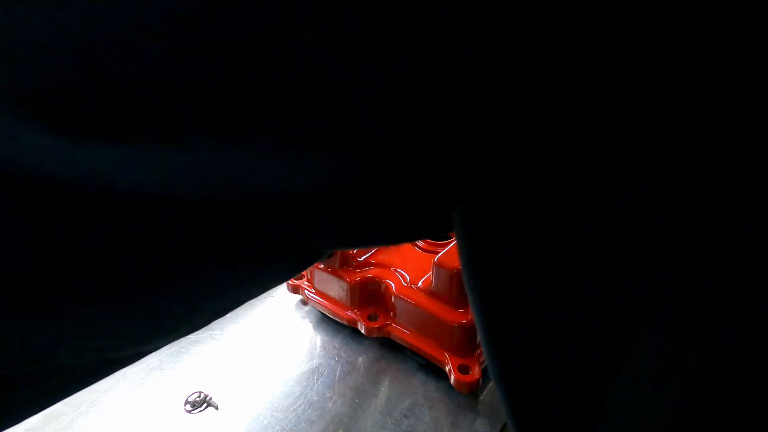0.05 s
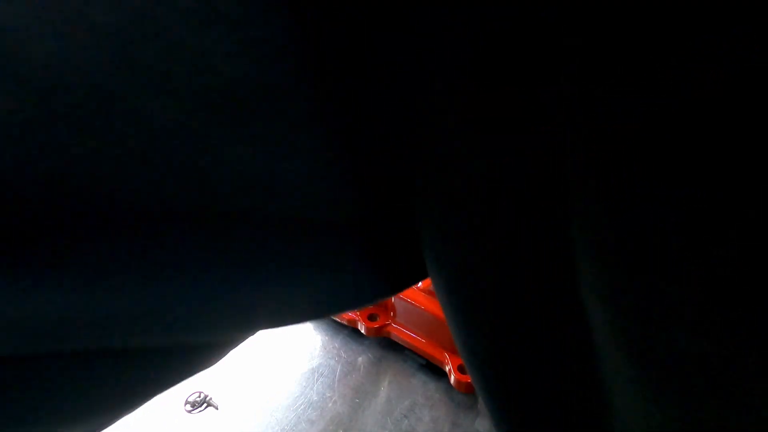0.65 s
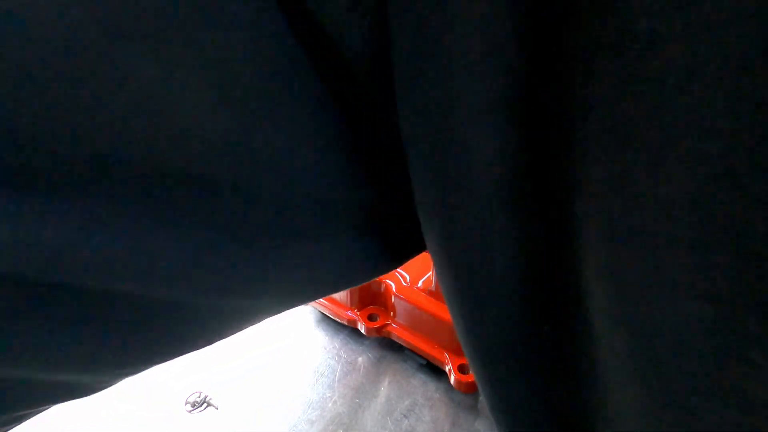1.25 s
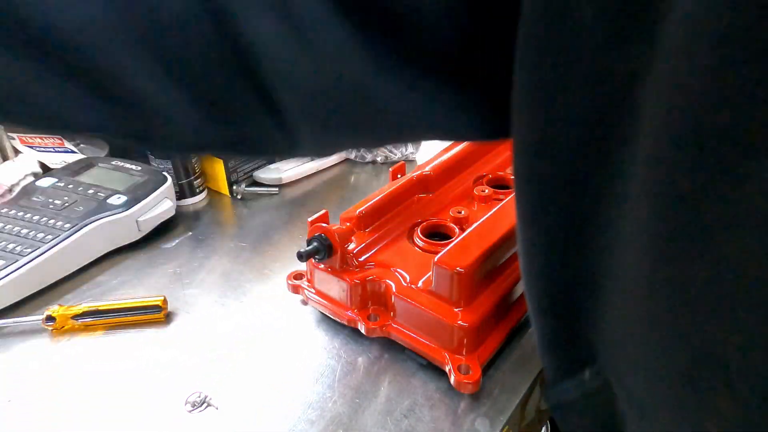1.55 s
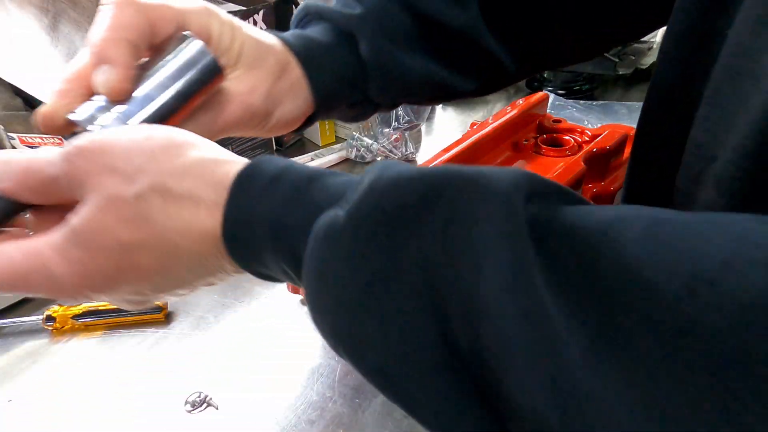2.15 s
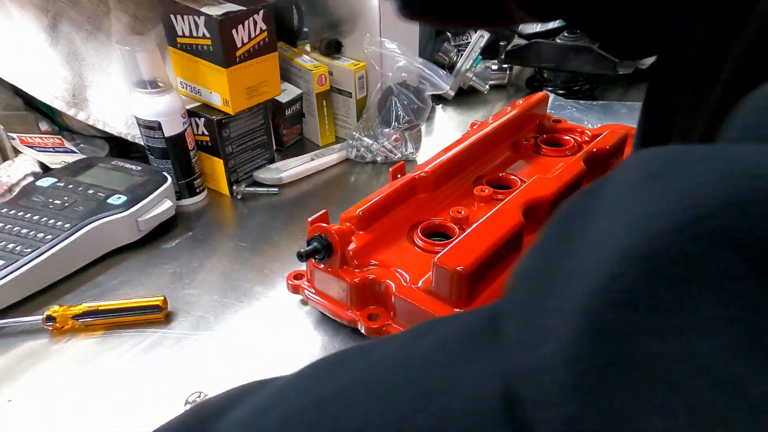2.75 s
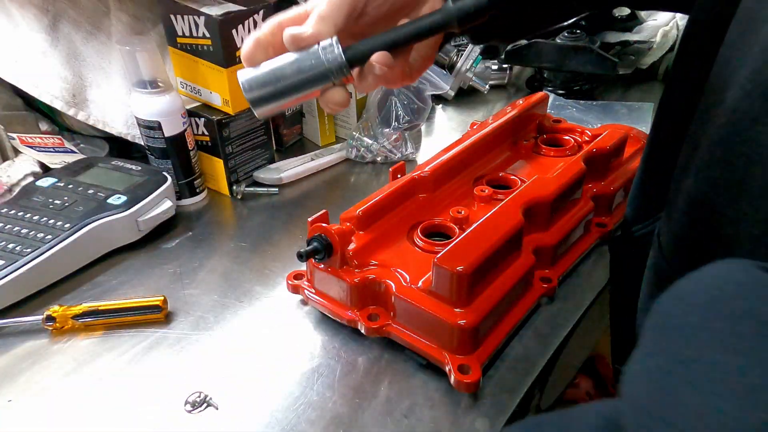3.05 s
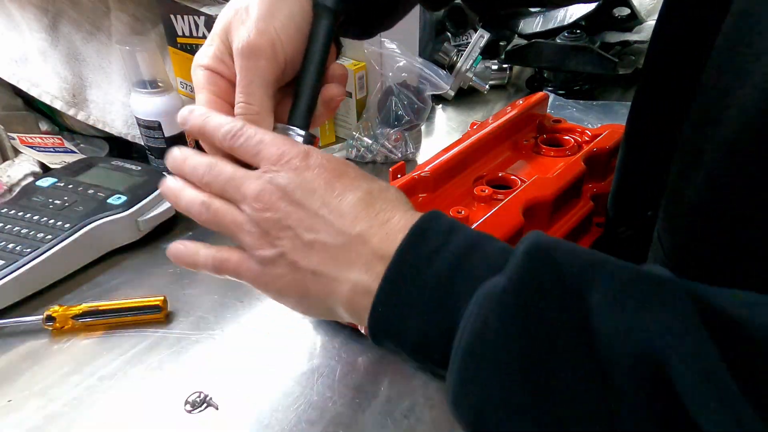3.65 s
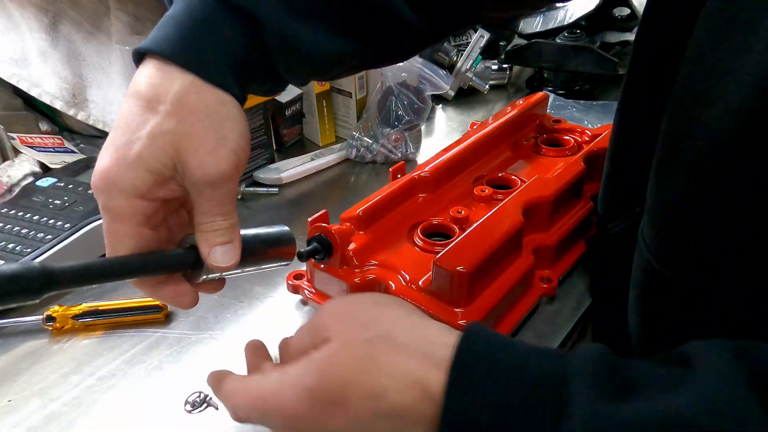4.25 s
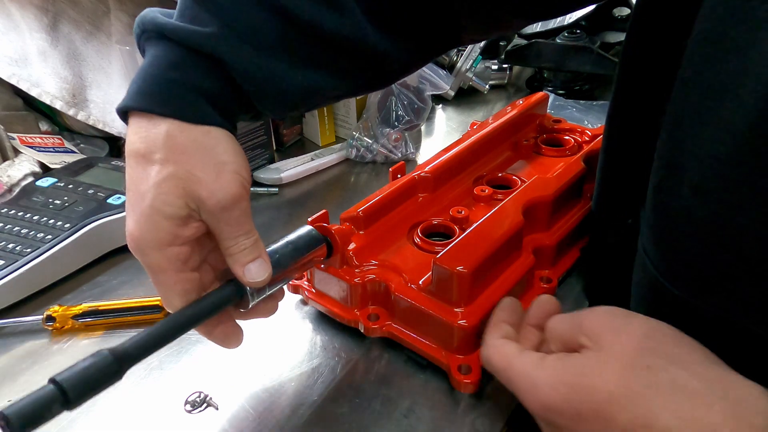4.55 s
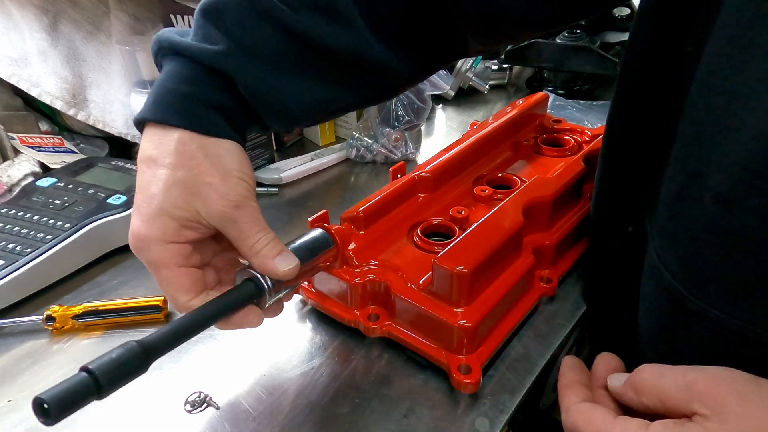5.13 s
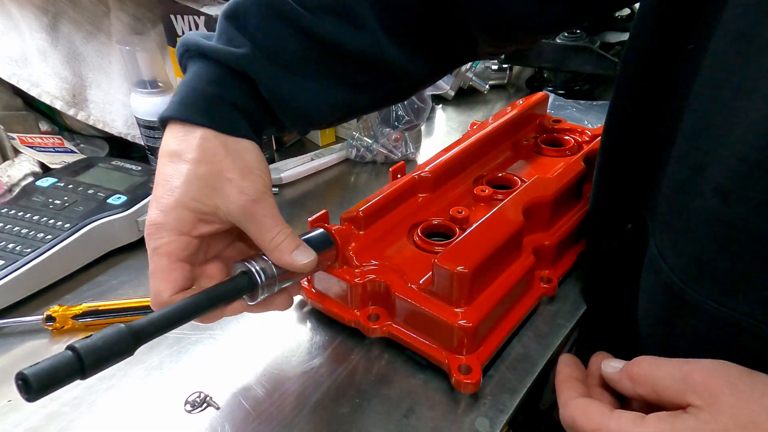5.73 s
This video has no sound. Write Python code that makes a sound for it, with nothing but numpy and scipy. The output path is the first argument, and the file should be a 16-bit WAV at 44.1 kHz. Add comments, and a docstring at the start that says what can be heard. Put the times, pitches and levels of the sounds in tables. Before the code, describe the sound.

In a small garage, steel tools clang and clink as a socket extension is drawn out from among them with a ringing scrape. A loose socket ticks, a spare tool clunks onto the workbench, and the socket rattles against the extension. It then knocks and thumps on a valve cover fitting, with faint, thin squeaks. Sleeves rustle over a low hum, heard in stereo at arm's length.

```python
"""Steel tools thump, clink and sing as a mechanic draws a socket extension out from among them.
A deep socket rattles and knocks on the extension in his hands, and a spare tool goes down on the bench.
The socket is then tried on a fitting of a valve cover, which thumps when pushed; the twists chirp.
Sleeves rustle over the faint hum of a small, cluttered garage. Stereo microphone at arm's length."""
import sys
import numpy as np
from scipy import signal
from scipy.fft import rfft, irfft, next_fast_len
from scipy.io import wavfile
from scipy.ndimage import uniform_filter1d

SR = 44100
rng = np.random.default_rng(int(sys.argv[2]) if len(sys.argv) > 2 else 0)


def transcribe(u):
    """Save the signal u as a 16-bit wav file named by the first command-line argument.

    u: samples, shape (n,) or (channels, n), limited to [-1, 1]; the rate is SR.
    q: integer samples, one column per channel.
    """
    v = np.clip(np.atleast_2d(u).T, -1, 1)
    q = np.round(v * 32767).astype(np.int16)
    wavfile.write(sys.argv[1], SR, q)


N = 259749
T = np.arange(N) / SR

# Modes of the steel tools, struck or rubbed: (frequency [Hz], level [dB], t60 [s])
STEEL_MODES = [(1725, -13, .1), (2053, -10, .2), (2498, -14, .25), (3044, -14, .25), (3836, -7, .2),
               (4328, -3, .3), (4694, -4, .16), (5125, -1, .3), (5321, 0, .3), (5650, -2, .06),
               (6280, -2, .2), (7224, -6, .1), (8037, -2, .35), (8474, -6, .3), (8690, -14, .2),
               (8905, -2, .3), (10840, -9, .25), (11240, -7, .2), (11510, -10, .3), (11940, -8, .35),
               (12060, -6, .45), (12250, -9, .3), (12720, -10, .3), (13120, -12, .25)]


def undb(db):
    """Decibels to gain."""
    return 10 ** (np.asarray(db) / 20)


def unit(x):
    """Scale to rms 1."""
    return x / np.sqrt(np.mean(x ** 2))


def fade(t, t60):
    """Exponential decay, 60 dB down after t60 seconds."""
    return np.exp(-np.log(1000) * t / t60)


def gesture(t, length_s, attack_s, release_s):
    """Envelope of a movement: it rises, holds until length_s and dies away."""
    return np.clip(t / attack_s, 0, 1) * np.exp(-np.maximum(t - length_s, 0) / release_s)


def add(out, start_s, sound):
    """Mix a sound in at its time."""
    i = int(start_s * SR)
    out[:, i:i + sound.shape[1]] += sound[:, :N - i]


def band(x, low_hz, high_hz):
    """Causal band-pass."""
    return signal.sosfilt(signal.butter(4, [low_hz, high_hz], "band", fs=SR, output="sos"), x)


def colour(x, hz, db):
    """Causal filter through (Hz, dB) points, built from the cepstrum."""
    n = 2 * next_fast_len(x.shape[-1] // 2 + 2048, True)
    gain_db = np.interp(np.log(np.arange(n // 2 + 1) * SR / n + 1), np.log(hz), db)
    cepstrum = irfft(np.log(undb(gain_db)))
    cepstrum[1:n // 2] *= 2
    cepstrum[n // 2 + 1:] = 0
    return irfft(rfft(x, n) * np.exp(rfft(cepstrum)))[..., :x.shape[-1]]


def drift(rate_hz, size=N):
    """Smooth random drift of rms 1."""
    hold = max(int(SR / rate_hz), 1)
    steps = np.repeat(rng.standard_normal(size // hold + 1), hold)
    return unit(uniform_filter1d(uniform_filter1d(steps, hold), hold)[:size])


def stereo_noise(size, side):
    """White noise whose stereo width grows with side."""
    mid, diff = rng.standard_normal((2, size))
    return mid + side * np.array([diff, -diff])


def panned(x, pan_db):
    """Place a sound by its left minus right level."""
    return x * undb(np.array([[pan_db], [-pan_db]]) / 2)


def placed(x, pan_db):
    """Pan the treble by pan_db; the bass reaches both channels nearly alike."""
    return np.array([colour(channel, [200, 1500], [db / 8, db / 2])
                     for channel, db in zip(x, (pan_db, -pan_db))])


def contact(strike, slide_s, band_db):
    """One contact: a slide repeats the strike as chatter, and the attack is brought toward band_db."""
    # Thump, body, edge and top: (low edge [Hz], high edge [Hz]), then (centre [Hz]) of each
    bands = [(80, 600), (600, 2500), (2500, 7000), (7000, 16000)]
    centres = [250, 1300, 4300, 10000]
    count = int(slide_s * SR)
    if count > 1:
        slipping = rng.random(count) < 1100 / SR  # about 1100 slips a second
        slips = slipping * rng.standard_normal(count) * np.linspace(1, .6, count)
        slips[0] = 1
        strike = signal.fftconvolve(strike, slips[None], axes=1)[:, :strike.shape[1]]
    attack = strike[:, :int((.012 + slide_s) * SR)]
    tint_db = np.zeros(len(bands))
    for _ in range(2):  # two passes, as the bands overlap
        tinted = colour(attack, centres, tint_db)
        power = [np.mean(band(tinted, *edges) ** 2) for edges in bands]
        tint_db += band_db - 10 * np.log10(power)
    curve_db = np.r_[tint_db[0] - 16, tint_db[0] - 1, tint_db, tint_db[-1] - 4]
    return colour(strike, [25, 90, *centres, 13000], curve_db)


def struck(hits, modes, balance_db, ring_s, pan_db, crack_db, crack_s, scatter_db, scatter_s):
    """An object's contacts: modes, a dense crack and scatter from things nearby; the times are t60s."""
    # Hardness moves energy upward: (thump, body, edge, top) [dB per dB of hardness]
    hardness_tilt = [-1.55, -0.29, 0.66, 0.79]
    usual_db, doubling_db = -31, 7  # every 7 dB over an ordinary contact doubles ring_s
    out = np.zeros((2, N))
    t = np.arange(int(.35 * SR)) / SR
    hz, db, t60 = np.transpose(modes)
    partials = fade(t, t60[:, None]) * np.exp(2j * np.pi * hz[:, None] * t)
    for start, slide_s, strength_db, hardness_db, *thump_db in hits:
        # each contact point favours other modes; high ones reach the two channels out of step
        size, sign, skew = rng.standard_normal((len(modes), 3)).T
        phase = np.array([[1], [-1]]) * skew * hz / 16000
        weights = np.sign(sign) * undb(db + 2 * size) * np.exp(1j * phase)
        free_s = ring_s * 2 ** ((strength_db - usual_db) / doubling_db)
        ring = (weights @ partials).imag * fade(t, max(free_s, .02))  # the fingers damp the steel
        burst = stereo_noise(len(t), .31) * fade(t, crack_s)
        scatter = stereo_noise(len(t), .97) * fade(t, scatter_s) * undb(scatter_db)
        crack = undb(crack_db) * signal.lfilter([1, -1], [1, -.93], burst + scatter)  # bass cut
        band_db = strength_db + np.array(balance_db) + hardness_db * np.array(hardness_tilt)
        if thump_db:  # a push that rocks the whole object sets its own thump
            band_db[0] = thump_db[0]
        add(out, start, contact(ring + crack, slide_s, band_db))
    return placed(out, pan_db)


def garage_air():
    """Room tone: gently wavering air noise and narrow bands of machine hum."""
    # Still air: (frequency [Hz], relative level [dB])
    air_spectrum = [(15, -38), (25, 7.5), (76, -11), (127, 2.5), (344, -11.5), (863, -30), (1100, -32),
                    (1440, -18.5), (1650, -16.5), (1890, -10.5), (2610, -15), (7510, -33.5), (12200, -40.5),
                    (14400, -65), (16000, -36.5)]
    # Machine hum: (centre [Hz], width [Hz], level [dB])
    hum_bands = [(119.24, 7.6, -58), (1644, 92, -66.5), (1107, 180, -73.5)]
    air = unit(colour(stereo_noise(N, .4), *np.transpose(air_spectrum))) * undb(-61 + drift(5.5))
    hum = sum(undb(db) * unit(band(stereo_noise(N, .34), hz - width / 2, hz + width / 2))
              for hz, width, db in hum_bands)
    return air + hum


def rustling_sleeves():
    """Cloth, skin and steel rub in grainy strokes; a bright stroke trades bass for hiss."""
    # Strokes of sleeves and hands: (time [s], length [s], level [dB], brightness [dB])
    strokes = [(0, 0.33, -58, -5), (0.317, 0.1, -39.5, -6), (0.724, 0.37, -44.5, 6),
               (1.104, 0.38, -44, 5.5), (1.807, 0.3, -60, 12.5), (2.291, 0.17, -64.5, 13),
               (2.955, .12, -47, -4.5), (3.145, 0.052, -41, 7), (3.26, 0.25, -57.5, 1),
               (3.48, 0.39, -52, -3.5), (4.018, 0.12, -64, 17), (4.634, 0.44, -55.5, -4),
               (5.098, 0.15, -44.5, -5), (5.22, .3, -44, 3), (5.576, 0.41, -48, -1.5)]
    # Register balance of a stroke, then the floor of arms that never quite rest: (low, mid, high) [dB]
    balance_db = [-2.5, -5.5, -18]
    fidget_db = [-58.5, -64.5, -71]
    # Colour of the rubbing: (frequency [Hz], relative level [dB])
    rub_spectrum = [(40, 3.5), (130, 3.5), (260, 1.5), (450, -10), (750, -18.5), (1080, -8.5), (1600, -16),
                    (2400, -12.5), (4000, -15), (7000, -15), (10000, -29.5), (12500, -32), (14000, -45.5)]
    gains = undb(fidget_db)[:, None] * np.ones(N)
    for start, length_s, db, bright_db in strokes:
        envelope = gesture(T - start, length_s, attack_s=.03, release_s=.064)
        stroke = undb(db + np.array(balance_db) + bright_db * np.array([-1, 0, 1]))
        gains = np.hypot(gains, stroke[:, None] * envelope)
    grain = stereo_noise(N, .36) * undb(1.97 * drift(500))
    rub = colour(grain, *np.transpose(rub_spectrum))
    registers = band(rub, 38, 550), band(rub, 590, 2640), band(rub, 3300, 14000)
    rustle = sum(gain * undb(2 * drift(25)) * unit(noise) for gain, noise in zip(gains, registers))
    return panned(rustle, 1.4)


def rummaged_tools():
    """Left of centre, tools knock and slide on each other and thump the surface under them."""
    # Tool on tool: (time [s], slide [s], strength [dB], hardness [dB])
    hits = [(.2925, 0.0015, -26.5, 3.5), (.3005, 0.015, -36, -13.5), (.3255, .006, -24.5, 3.5),
            (.3335, 0.0074, -23, -1), (.35, 0.0061, -40.5, -4), (.385, 0.098, -42, 7.5),
            (.5858, 0.019, -45, 5), (.6114, 0.003, -39, -1), (.7086, 0.012, -43.5, 3.5),
            (.768, 0.0038, -41, 1.5), (.7819, 0.0056, -39.5, -2), (.7937, 0.013, -43, 18.5),
            (.82, 0.021, -33, 2), (.878, 0, -52.5, 17), (.9314, 0.02, -45.5, 2), (.979, 0.0051, -43, -1.5),
            (1.0205, 0.016, -49.5, 5.5), (1.0672, 0.0089, -43, 1.5), (1.0953, 0.015, -47, 2.5),
            (1.1196, 0, -38.5, 3), (1.1791, 0.022, -37.5, -1.5), (1.186, 0.028, -35.5, 4.5),
            (1.212, 0.031, -33, 5), (1.25, 0.04, -45, -1), (1.402, 0.011, -33, 8),
            (1.428, 0.013, -34.5, 8.5), (1.4581, 0.002, -35.5, 8.5), (1.4751, 0.0046, -37.5, 7),
            (1.5416, 0.0061, -42.5, 3.5), (1.5914, 0.023, -46.5, 5)]
    # Surface under the tools: (frequency [Hz], level [dB], t60 [s])
    tray_modes = [(87, -2, 0.094), (124.3, 6, 0.63), (157, -2.5, .08), (238, -2.5, 0.17),
                  (265.5, 10.5, 0.12), (317, 4, 0.17), (416, 6.5, 0.078), (418, 10.5, 0.072),
                  (549, -3, 0.12), (643, -10, .05), (828, -5.5, 0.065), (966, 3, 0.13), (1026, 6, 0.15),
                  (1191, -6, 0.24)]
    # Tone of the pile: (thump, body, edge, top) [dB]
    balance_db = [2, -3, 0, -7.5]
    return struck(hits, STEEL_MODES + tray_modes, balance_db, ring_s=.15, pan_db=4.8,
                  crack_db=18, crack_s=.009, scatter_db=-21, scatter_s=.11)


def steel_tone(t, near_hz):
    """A fluttering tone locked to the nearest steel mode; higher ones are further out of step in stereo."""
    mode_hz = np.transpose(STEEL_MODES)[0]
    hz = mode_hz[np.argmin(abs(mode_hz - near_hz))]
    flutter_db = 1.1 * drift(35, len(t)) + .8 * drift(300, len(t))
    phase = 2 * np.pi * hz * t + .51 * drift(40, len(t))
    return undb(flutter_db) * np.sin(phase + np.array([[1], [-1]]) * hz / 17000)


def singing_steel():
    """A clang, then steel drawn along steel: each mode swells as the contact crosses its antinode."""
    # A long tool ringing freely: (frequency [Hz], level [dB], t60 [s])
    clang_modes = [(1725, -25.5, 0.17), (2053, -9, 0.22), (3044, -23, 0.28), (4328, -25.5, 0.41)]
    # The extension drawn over the other tools: (time [s], length [s], level [dB])
    pulls = [(0.327, 0.33, 2), (.815, 0.06, -19), (1.188, 0.14, -14.5), (1.405, 0.078, -13)]
    # Partials of each pull: (frequency [Hz], peak [dB], antinode place [pulls], antinode width [pulls])
    singing_modes = [(2498, -31, 0, 0.26), (4328, -34.5, 0.71, 0.16), (5125, -24.5, 0.28, 0.2),
                     (5321, -35, 0, 0.3), (6280, -34.5, 0.37, 0.16), (8037, -33, 0.47, 0.27),
                     (8474, -27.5, 0.27, 0.27), (8905, -29.5, 0.1, .25), (10840, -33, 0, .2),
                     (11240, -47, .1, .3), (11510, -41.5, .15, 0.24), (11880, -46.5, 0.1, .3),
                     (12360, -43, .1, .4), (12430, -37, .1, .35), (12720, -47, 0.6, 0.37),
                     (13120, -47, .25, .25)]
    # Tones left ringing until the fingers still them: (time [s], frequency [Hz], level [dB], t60 [s])
    lingering = [(.82, 4328, -32.5, 0.42), (.818, 8905, -27, 0.18), (1.3, 12060, -54.5, 0.88),
                 (1.215, 8037, -42, 0.36), (1.403, 6280, -19.5, 0.18)]
    clang_s, rise_s = .2935, .0059
    out, t = np.zeros((2, N)), T[:SR // 2]
    rise = 1 - np.exp(-t / rise_s)
    for hz, db, t60 in clang_modes:
        add(out, clang_s, undb(db) * rise * fade(t, t60) * steel_tone(t, hz))
    for start, length_s, pull_db in pulls:
        pull = gesture(t, length_s, attack_s=.007, release_s=.071)  # the hand closes at the end
        for hz, db, place, width in singing_modes:
            swell = np.exp(-.5 * ((t / length_s - place) / width) ** 2)
            add(out, start, undb(pull_db + db) * pull * swell * steel_tone(t, hz))
    for start, hz, db, t60 in lingering:
        add(out, start, undb(db) * rise * fade(t, t60) * steel_tone(t, hz))
    return panned(out, 6.4)


def knocking_extension():
    """Socket and extension knock in the hand, damped by the grip."""
    # Knocks: (time [s], slide [s], strength [dB], hardness [dB])
    hits = [(.8968, 0.00092, -45, -6), (1.1528, 0.00037, -38, -9.5), (3.4793, 0.002, -24, -0.5),
            (3.4952, 0.0067, -43, 6), (3.568, 0.0013, -28, -3), (3.621, 0.0055, -32.5, -3),
            (3.6864, 0.0051, -35, 8), (3.7703, 0.0016, -30.5, 0), (3.8067, 0, -41, 1),
            (3.8305, 0.00047, -29.5, 0), (3.8368, 0.0029, -32.5, 8), (3.8656, .003, -38.5, 8.5),
            (3.8803, 0.013, -42, -5.5), (3.892, 0.00051, -46.5, -5)]
    # Gripped steel: (frequency [Hz], level [dB], t60 [s]), then its (thump, body, edge, top) [dB]
    modes = [(273, -7.5, 0.14), (507, -19, 0.075), (902, -5.5, 0.23), (1138, 1, 0.07), (1327, 3.5, 0.028),
             (1574, 1.5, 0.038), (1865, -1.5, 0.036), (2380, -3, 0.023), (2710, 6, 0.014),
             (3580, -26, 0.19), (5800, -6, 0.017), (7310, 2.5, 0.14)]
    balance_db = [-11, 2.5, -2, -9.5]
    return struck(hits, modes, balance_db, ring_s=.1, pan_db=3.8,
                  crack_db=17, crack_s=.013, scatter_db=-20, scatter_s=.11)


def rattling_socket():
    """The loose socket ticks on its drive."""
    # Ticks: (time [s], slide [s], strength [dB], hardness [dB])
    hits = [(2.0433, .005, -52, 4.5), (2.1122, 0, -53, -3.5), (2.1691, 0.0048, -51, -2.5),
            (2.3362, 0.0065, -45, 4), (3.1064, 0, -35.5, -2.5), (3.1619, 0.0041, -38.5, 2),
            (3.222, 0.0031, -41, -4), (3.2544, 0, -40, 1), (3.3115, 0.0028, -40.5, 8), (3.3232, 0, -40, 7),
            (3.3663, 0.0087, -47, 5), (3.3965, 0, -38, 3.5), (3.9741, 0.0032, -45, 0)]
    # Loose socket: (frequency [Hz], level [dB], t60 [s]), then its (thump, body, edge, top) [dB]
    modes = [(2030, -10, .07), (2455, -7, .12), (3849, -4, .5), (4020, -3, .04), (5300, -2, .03),
             (5900, -2, .035), (7510, -11, .1), (10120, -5, .06)]
    balance_db = [-16.5, -8, 0.5, -6]
    return struck(hits, modes, balance_db, ring_s=.26, pan_db=4.4,
                  crack_db=10, crack_s=.016, scatter_db=-21, scatter_s=.12)


def tool_on_bench():
    """A spare tool is put down and sets the bench top ringing."""
    # Landings: (time [s], slide [s], strength [dB], hardness [dB])
    hits = [(2.9422, 0.0014, -22, 2), (3.0331, .002, -28.5, 3.5), (3.05, 0.0018, -49, -5.5)]
    # Bench top: (frequency [Hz], level [dB], t60 [s]), then its (thump, body, edge, top) [dB]
    modes = [(106, -14.5, 0.58), (146, -14.5, 0.11), (230, -5.5, .12), (262.4, -1.5, 0.12),
             (774, -5.5, 0.049), (327, 2.5, 0.055), (397, 1, 0.1), (437, -6.5, 0.093), (476, -9.5, 0.15),
             (558, -6, 0.15), (635, -2.5, 0.16), (1390, -4, 0.077), (1680, 2.5, 0.049), (2085, 1.5, 0.0297),
             (6100, 8, .05), (6670, 1, .04)]
    balance_db = [4.5, -3, -0.5, -7]
    return struck(hits, modes, balance_db, ring_s=.15, pan_db=3.5,
                  crack_db=21.5, crack_s=.015, scatter_db=-18, scatter_s=.14)


def valve_cover():
    """Straight ahead of the microphone, the socket meets the fitting and rocks the cover."""
    # Pushes: (time [s], slide [s], strength [dB], hardness [dB], thump [dB])
    hits = [(4.6927, 0.0018, -28, 8, -59), (4.7453, .002, -29, 13, -31), (5.045, 0.0075, -46.5, -11.5, -43),
            (5.0873, .002, -38, 8.5, -42), (5.1931, 0.0069, -37.5, 1, -37.5),
            (5.2187, 0.00027, -14.5, 11, -35), (5.472, 0.0026, -25.5, 5, -39.5),
            (5.54, 0.029, -43.5, 2, -45), (5.679, .0045, -28, -6.5, -44), (5.742, 0.0017, -40, -7, -45),
            (5.774, 0.0015, -26.5, -8, -39.5), (5.845, 0.006, -40, -11, -42.5)]
    # Cover and socket: (frequency [Hz], level [dB], t60 [s]), then their (thump, body, edge, top) [dB]
    modes = [(148, -12, .14), (240, -9, .12), (565, -10, .09), (960, -4, .04), (1070, 3, .07),
             (1230, -5, .04), (1600, 4, .06), (1770, 2, .05), (1960, -1, .04), (2260, -1, .04),
             (2820, -5, .03), (3200, 2, .025), (3900, -6, .03), (4270, -14, .025), (8690, -10, .5)]
    balance_db = [-12, 0, -18, -40]
    return struck(hits, modes, balance_db, ring_s=.69, pan_db=-.5,
                  crack_db=11.5, crack_s=.04, scatter_db=-22, scatter_s=.15)


def chirping_socket():
    """A high mode of the socket squeaks thinly and unevenly at each twist on the fitting."""
    # Twists: (time [s], level [dB])
    twists = [(4.71, -65.5), (5.2, -61.5), (5.48, -61.5), (5.635, -57.5)]
    chirp_hz, width_s = 8690, .025
    swell = sum(undb(db) / (1 + ((T - peak_s) / width_s) ** 2) for peak_s, db in twists)
    return panned(swell * undb(5.5 * drift(60)) * steel_tone(T, chirp_hz), 4)


def garage_walls(x, wet_db, low_t60, high_t60):
    """Diffuse echo of a cluttered room; the treble dies first."""
    t = np.arange(SR // 2) / SR
    noise = stereo_noise(len(t), .26)
    low = band(noise, 74, 3000) * fade(t, low_t60)
    high = undb(-4.5) * band(noise, 3500, 14000) * fade(t, high_t60)
    build_up = np.clip(t / .018, 0, 1)
    decay_energy = SR * low_t60 / np.log(1e6)
    tail = (low + high) * build_up / np.sqrt(decay_energy)
    return undb(wet_db) * signal.fftconvolve(x, tail, axes=1)[:, :N]


def scene():
    """The bench from an arm's length away: tools with their echo, sleeves and room tone."""
    steel = singing_steel() + chirping_socket() + rummaged_tools()
    held = tool_on_bench() + rattling_socket() + knocking_extension() + valve_cover()
    tools = steel + colour(held, [10000, 12500, 15000], [0, -6, -14])  # gripped tools are duller on top
    echo = garage_walls(tools, wet_db=-12.5, low_t60=.36, high_t60=.26)
    return tools + echo + rustling_sleeves() + garage_air()


def record(dry):
    """The treble falls away above 13 kHz and ends at 16 kHz; the loudest peaks are softly rounded."""
    dulled = colour(dry, [13100, 13800, 16000], [0, -9, -12])
    rounded = np.tanh(.7 * dulled) / .7
    return signal.sosfilt(signal.ellip(8, .2, 70, 16000, fs=SR, output="sos"), rounded)


dry = scene()
out = record(dry)
transcribe(out)
```